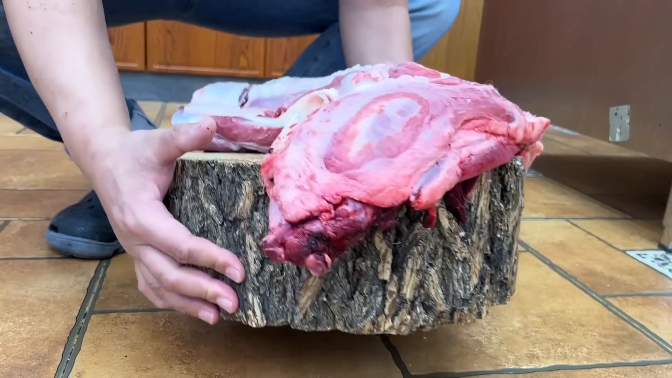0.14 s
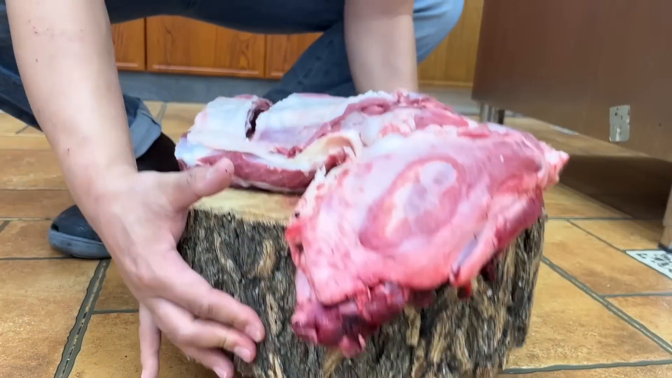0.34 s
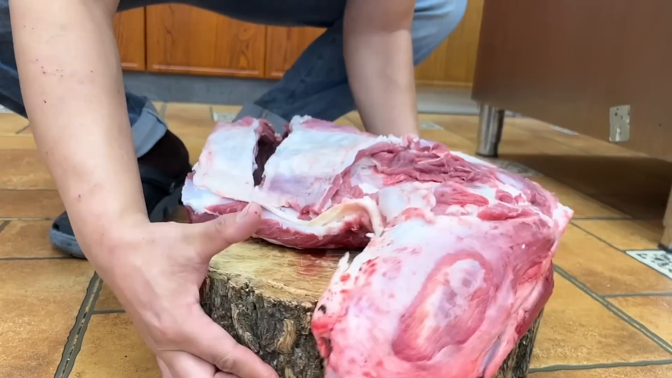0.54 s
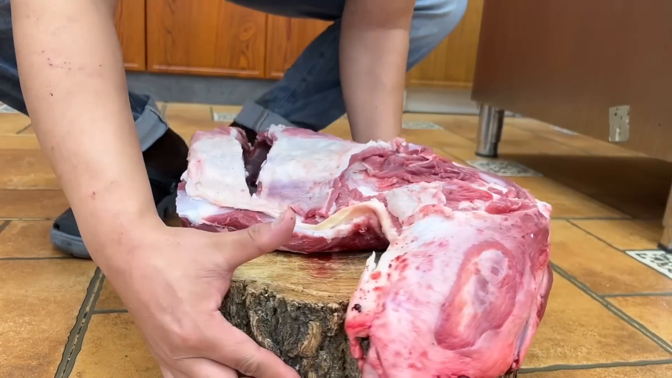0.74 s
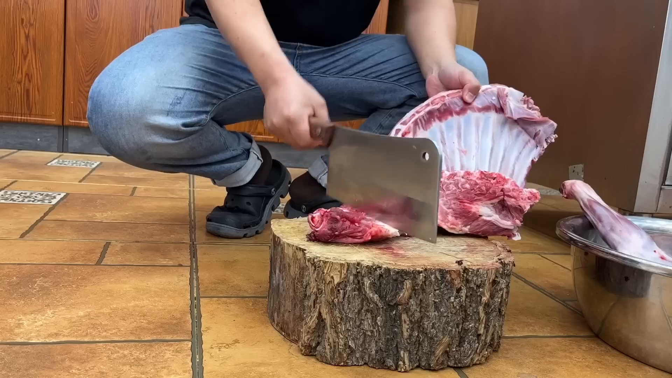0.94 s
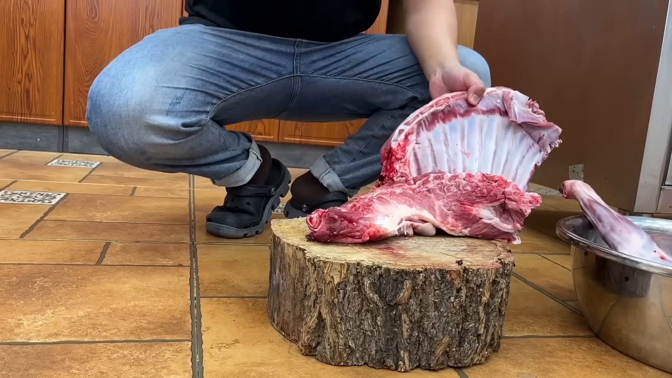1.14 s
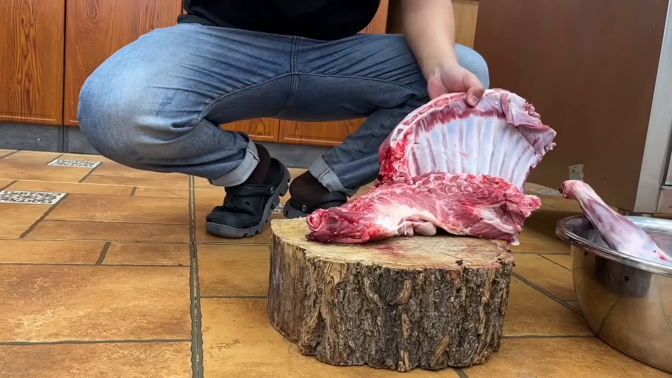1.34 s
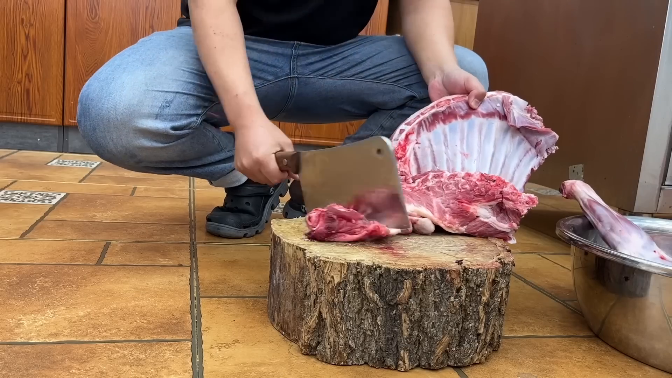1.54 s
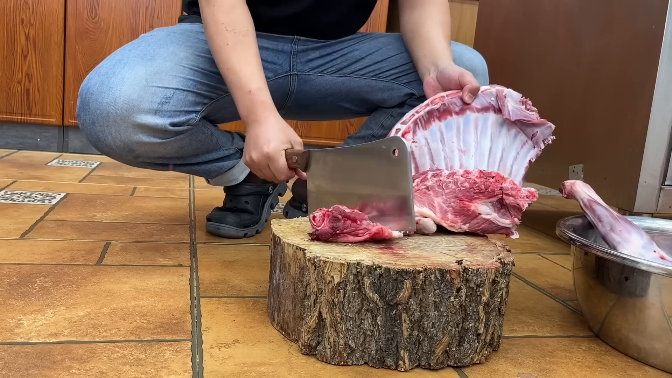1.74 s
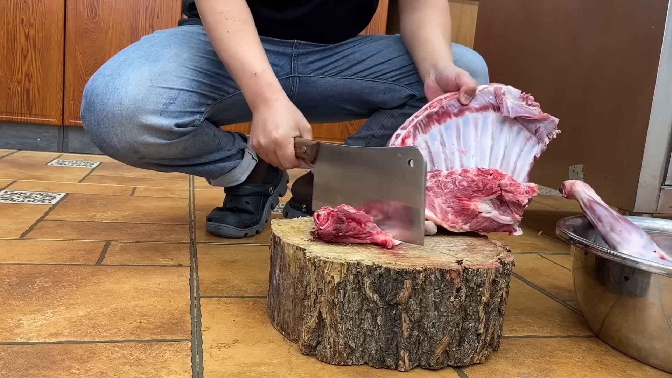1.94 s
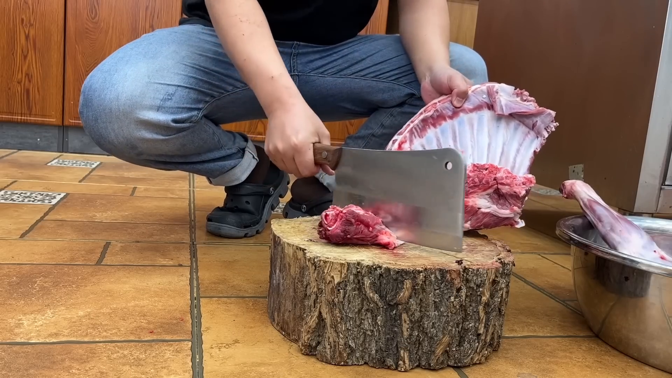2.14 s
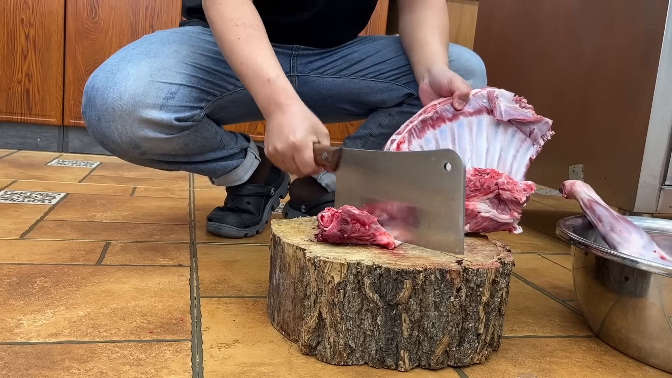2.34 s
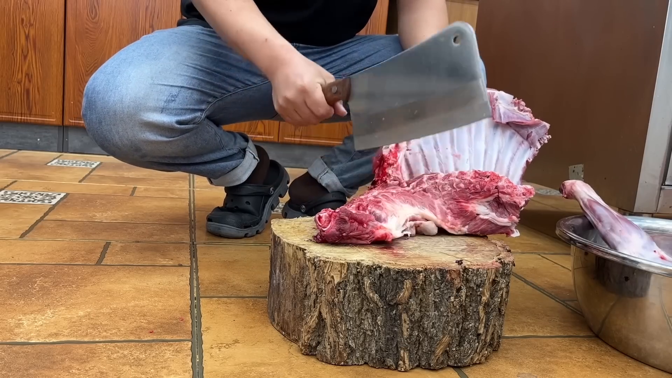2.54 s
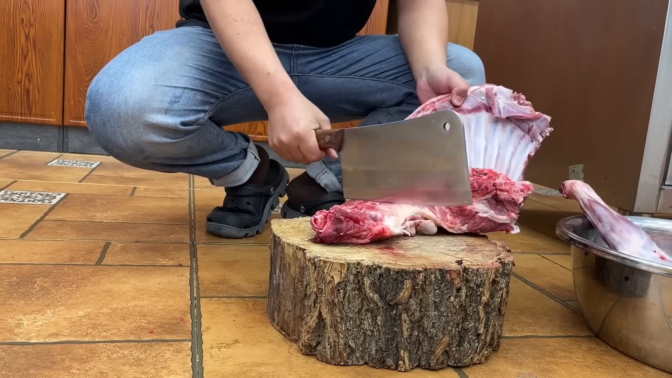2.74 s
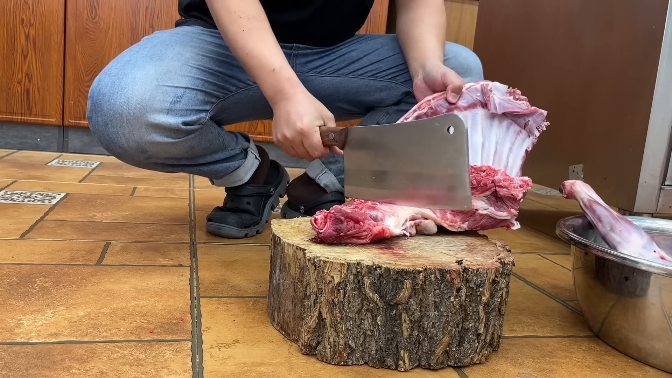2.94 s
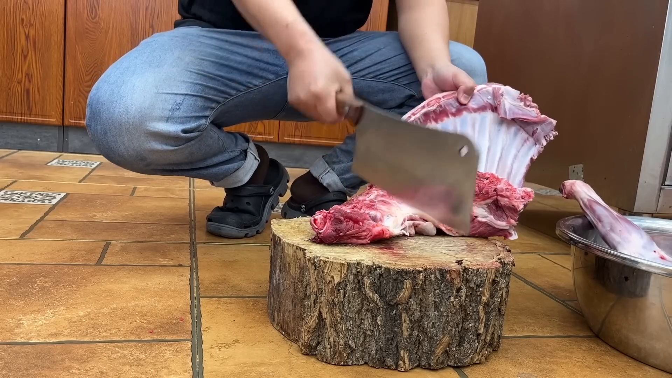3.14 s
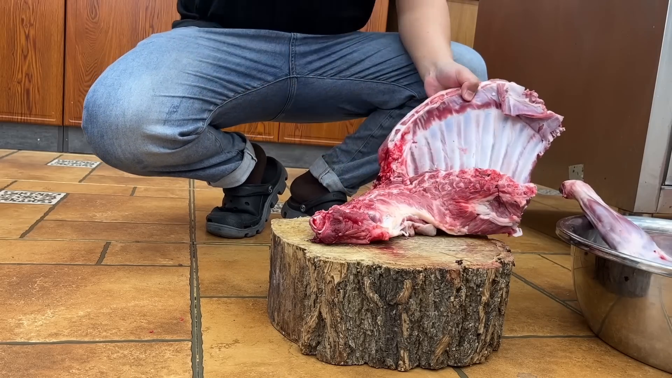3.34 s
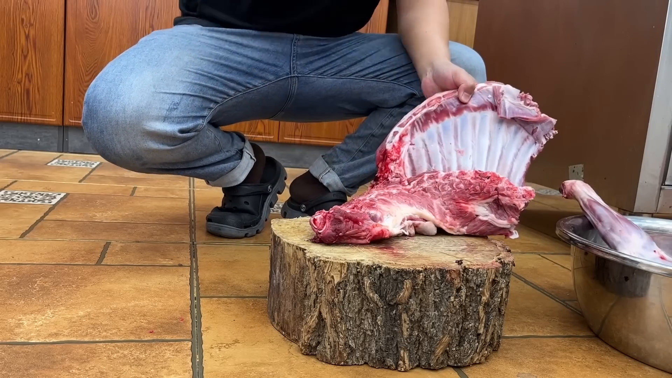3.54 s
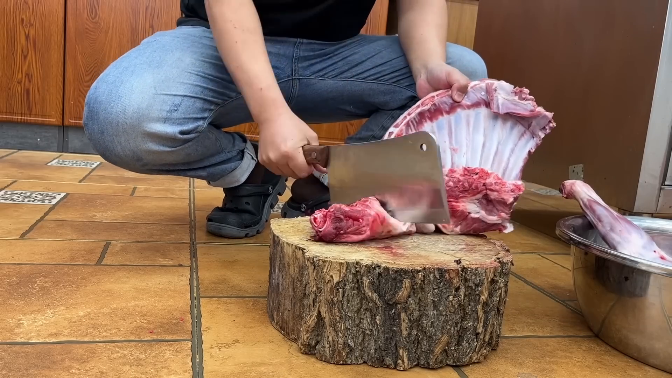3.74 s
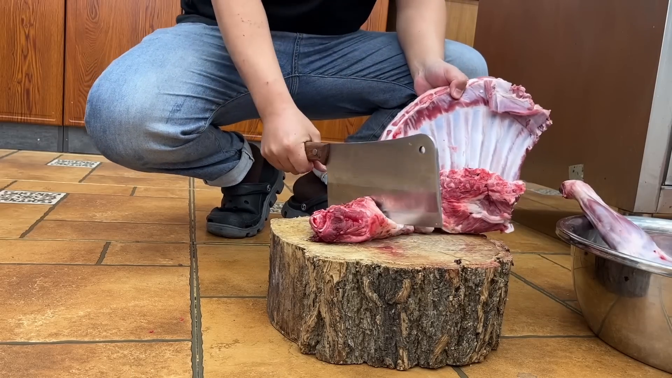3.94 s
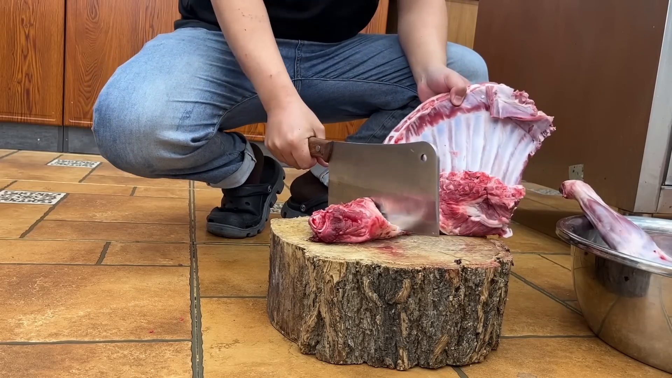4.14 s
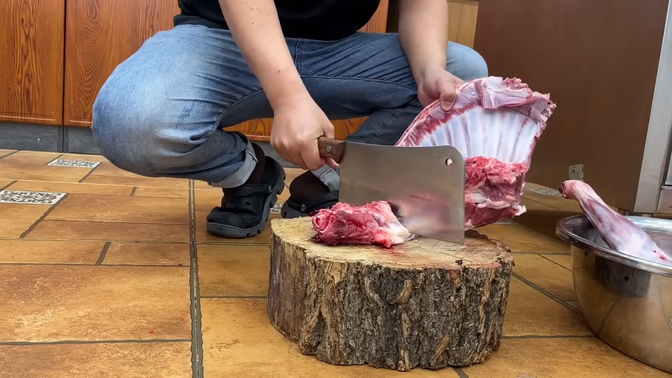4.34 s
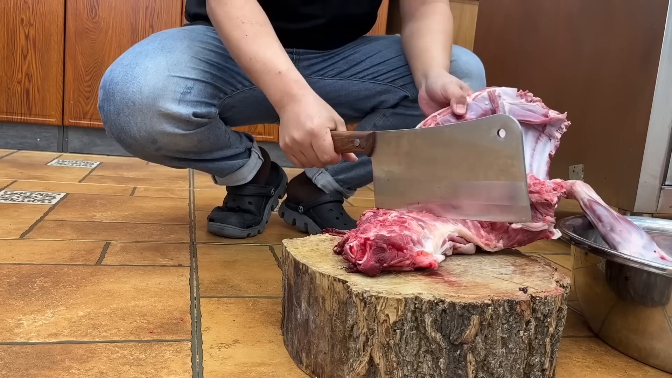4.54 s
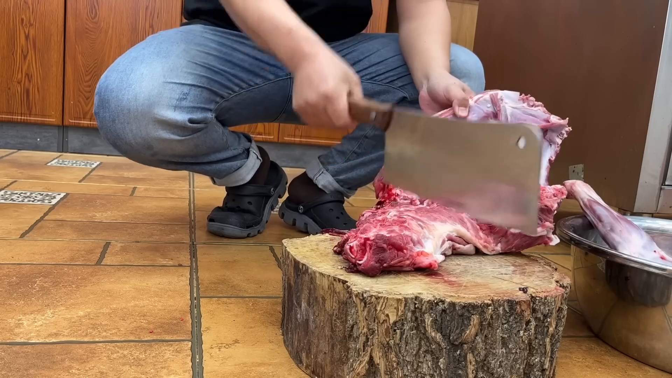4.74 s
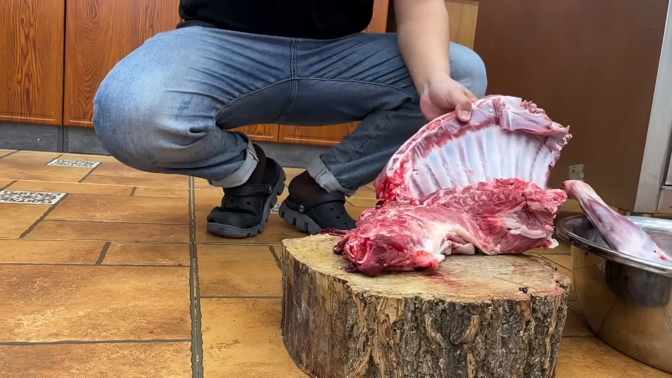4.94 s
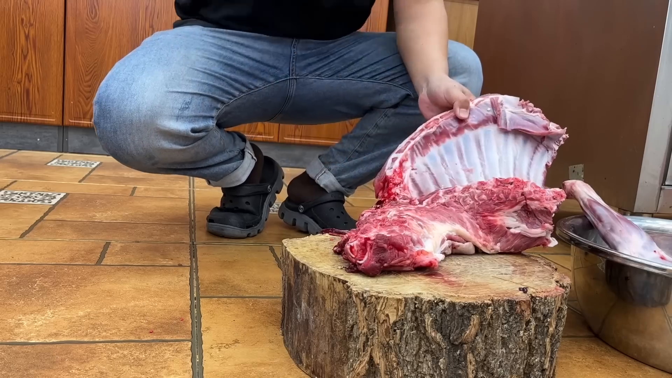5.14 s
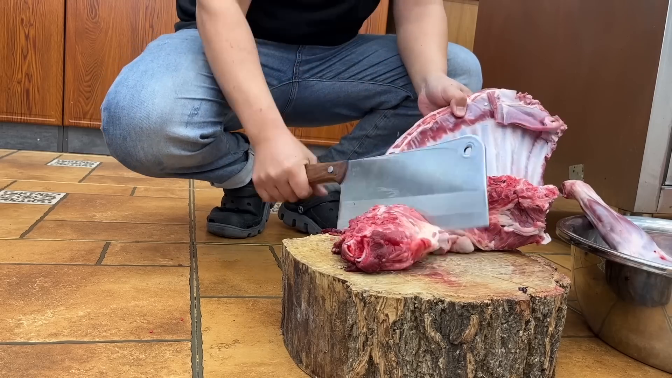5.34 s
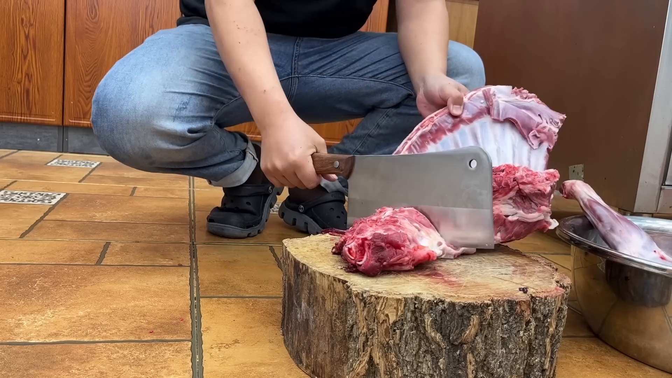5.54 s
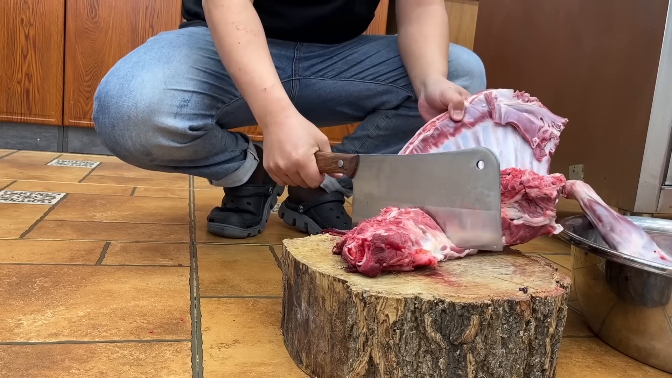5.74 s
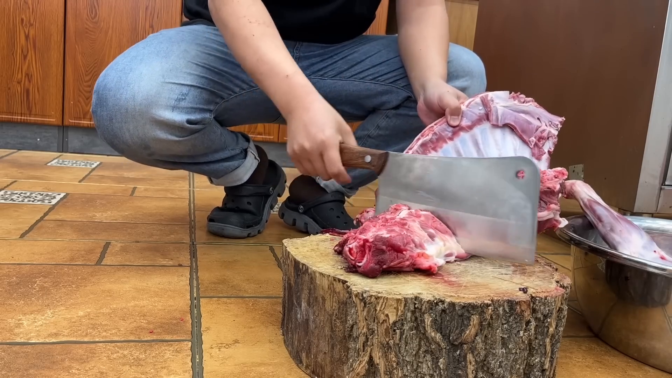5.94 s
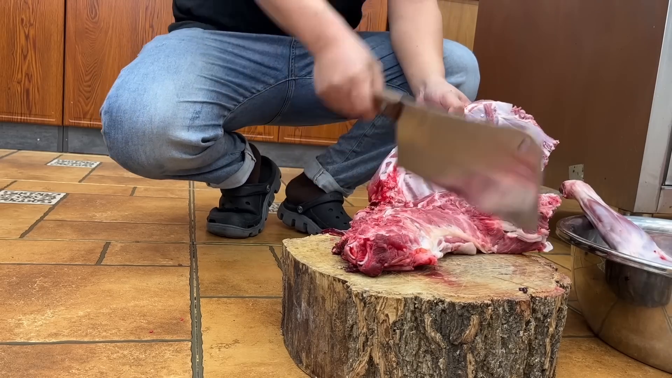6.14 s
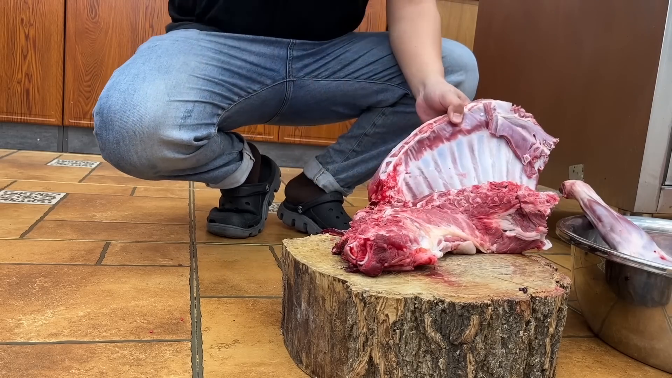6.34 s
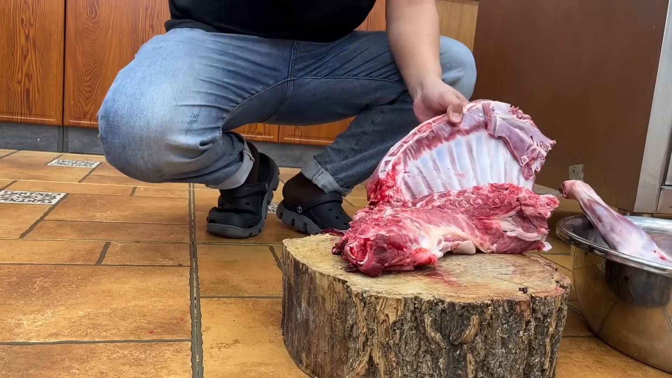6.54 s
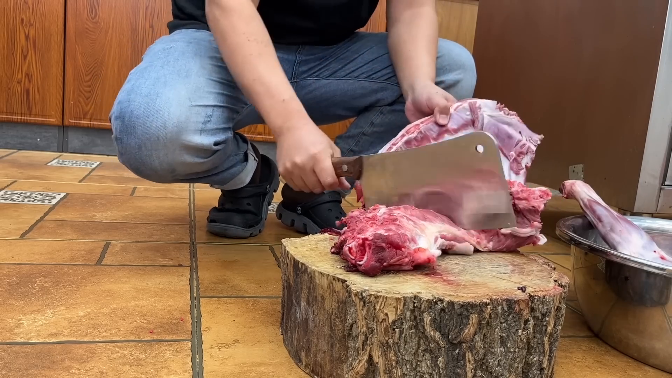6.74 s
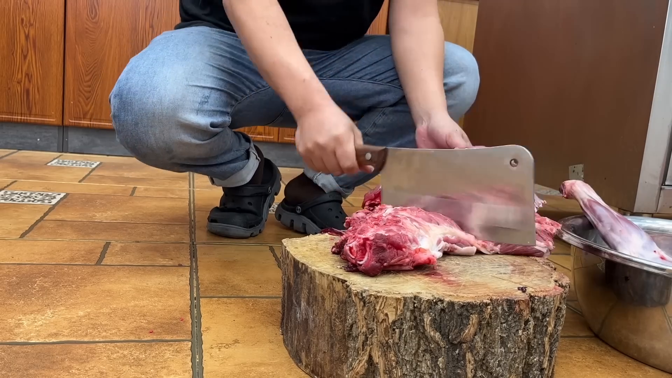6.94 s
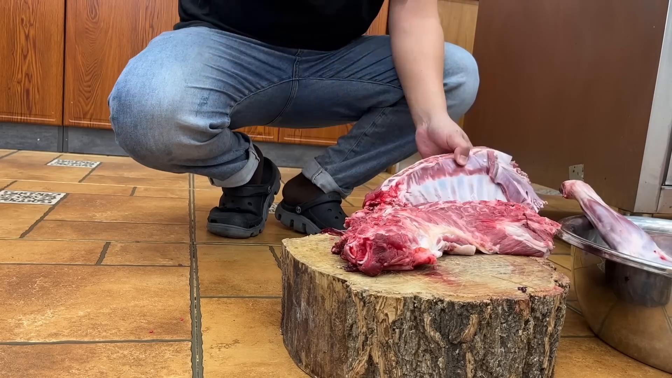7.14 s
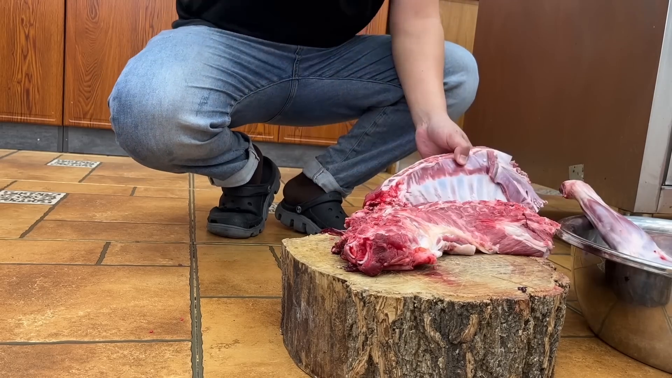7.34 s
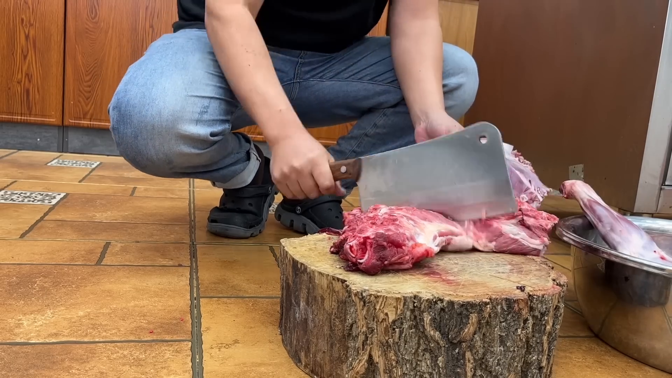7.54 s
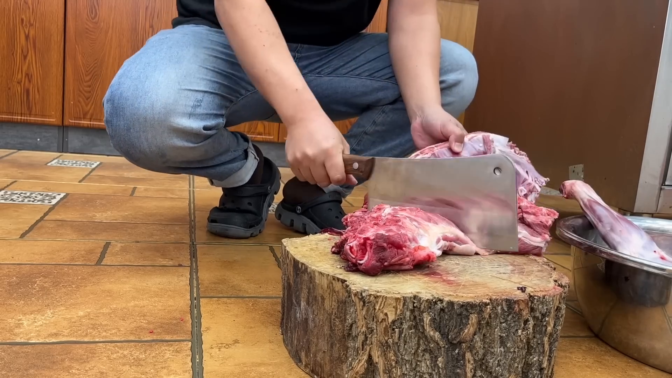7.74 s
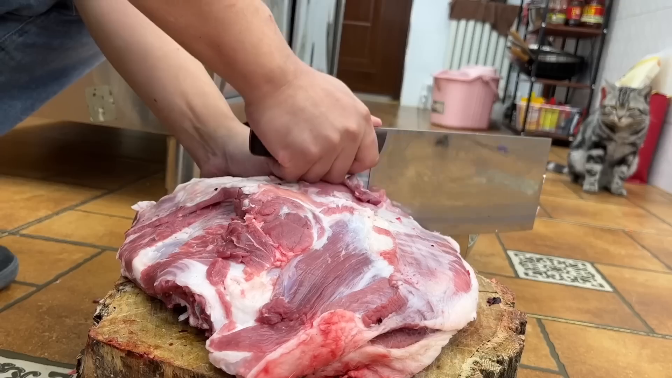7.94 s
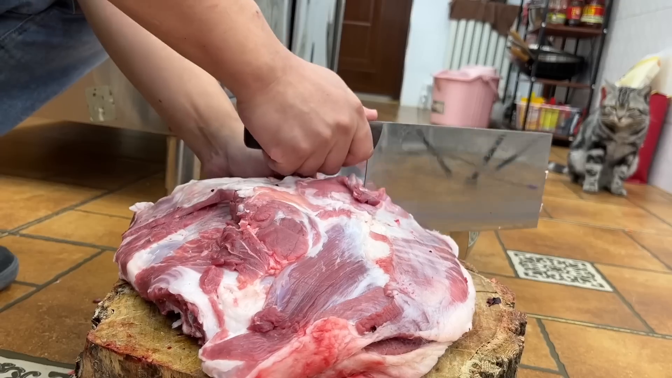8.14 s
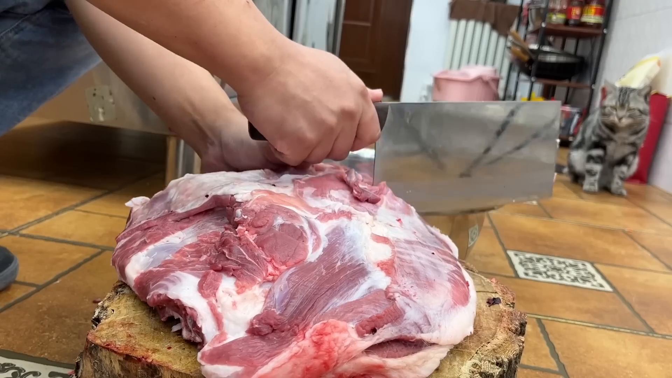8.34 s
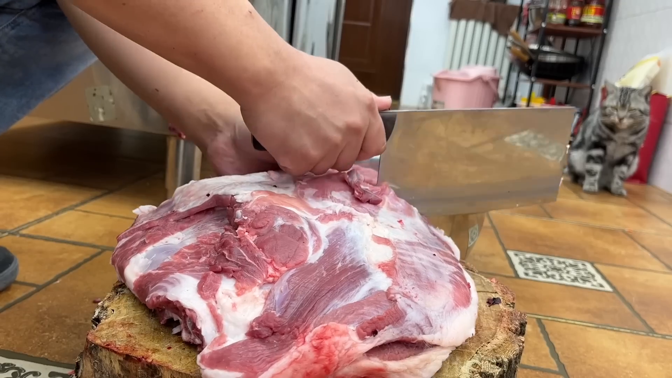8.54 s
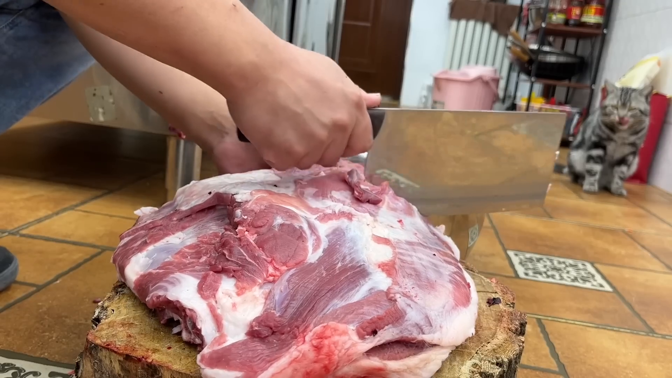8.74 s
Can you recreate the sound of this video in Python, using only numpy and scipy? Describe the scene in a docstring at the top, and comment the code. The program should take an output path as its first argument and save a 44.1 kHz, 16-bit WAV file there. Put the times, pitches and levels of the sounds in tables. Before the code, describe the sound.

Over a very faint low hum, hands and cloth rustle from the start, with small scrapes. A heavy wooden block bumps the tiled floor at about 0.47 s and again, a little softer, at 0.59; the echo stops short near 0.9. After a quiet gap and a brush, a cleaver chops hard at 1.4 s: splintery crack, hollow wooden knock, low floor thud and a brief steel ring. Thin blade whines follow, and metallic clinks at 2.1, 2.35 and 2.6 amid rustling. More chops fall at 3.6, 5.2, 6.57 and 7.43 s, varying from woody to sharp and clicky, with bright hard-room echoes, some abruptly cut near 6.1, 7.0 and 7.95. Scuffs and cloth movement fill the gaps. From 8 s only close, hissy handling, soft muffled knocks at 8.1 and 8.7, and a faint low drone remain. Stereo microphone nearby, peaks softly overloaded.

```python
"""Hands and cloth rustle over a faint hum as a wooden block bumps down on a tiled floor; then a heavy cleaver chops
meat and bone on it in a hard, echoing room. Each chop is a splintery noise crack, a filtered knock, ringing block
modes and a low floor thud; in between, the blade clinks as decaying sines, and shaped noise makes brushes, thin
whines and one low drone. A decaying noise tail makes the echoes, some of which stop short."""
import sys
import numpy as np
from scipy import signal
from scipy.fft import rfft, irfft
from scipy.io import wavfile
from scipy.ndimage import uniform_filter1d

SR = 44100
rng = np.random.default_rng(int(sys.argv[2]) if len(sys.argv) > 2 else 0)


def dump(signal):
    """Clip the signal to [-1, 1] and save it as 16-bit WAV at the path in sys.argv[1]."""
    limited = np.clip(np.atleast_2d(signal).T, -1, 1)
    pcm = np.round(limited * 32767).astype(np.int16)
    wavfile.write(sys.argv[1], SR, pcm)


N = 391166  # length in samples


def gain_of(db):
    """Decibels to amplitude factor."""
    return 10 ** (np.asarray(db) / 20)


def evened(x):
    """Scales a signal to an RMS of one."""
    return x / np.sqrt(np.mean(x ** 2) + 1e-20)


def scaled(x, db, length_s):
    """Sets the energy of a short sound to that of an RMS level held for length_s."""
    return x * gain_of(db) / np.sqrt((x ** 2).sum() / (length_s * SR))


def read(points, hz):
    """Reads a curve of (frequency, value) points along a log frequency axis."""
    f, value = np.transpose(points)
    return np.interp(np.log(hz + 1), np.log(f + 1), value)


def octaves(hz, centre_hz):
    """Signed distance from a centre pitch, in octaves."""
    return np.log2((hz + 1) / centre_hz)


def colour(db_of):
    """Minimum-phase filter whose gain in dB is a function of frequency, so nothing sounds ahead of the blow."""
    level_db = np.maximum(db_of(abs(np.fft.fftfreq(4096, 1 / SR))), -100)
    log_gain = np.log(gain_of(level_db))
    return np.fft.ifft(np.exp(np.conj(signal.hilbert(log_gain)))).real[:2048]


def ring(modes, t, best_hz, slope_db, damping=0.99, rise_s=0.0009):
    """Decaying sines started by one blow; modes lose slope_db per octave away from best_hz."""
    hz, db, t60 = np.transpose(modes)[:, :, None]
    level_db = db - slope_db * abs(np.log2(hz / best_hz)) - 60 * damping * t / t60
    sines = gain_of(level_db) * np.sin(2 * np.pi * hz * t)
    return sines.sum(0) * (1 - np.exp(-t / rise_s))


def add(mix, start_s, sound):
    """Lays a sound into the mix, trimmed at the end."""
    part = mix[:, round(start_s * SR):][:, :sound.shape[1]]
    part += sound[:, :part.shape[1]]


# hum swells: t/s, half width/s, rise of level/dB
HUM_SWELLS = [(.3, 0.18, 20.5), (7.25, 0.16, 7.5), (8.201, 0.17, 12.5)]
HUM_HZ, HUM_DB = 100, -67


def hum():
    """A low sine whose phase and level waver slowly, with brief swells."""
    t = np.arange(N) / SR
    noise = rng.standard_normal((2, N))
    phase_waver, level_waver = evened(uniform_filter1d(uniform_filter1d(noise, 2500), 2500))
    phase = 2 * np.pi * HUM_HZ * t + 0.8 * phase_waver
    swell_db = sum(db * np.exp(-((t - at) / half) ** 4) for at, half, db in HUM_SWELLS)
    return gain_of(HUM_DB + swell_db + 0.83 * level_waver) * np.sin(phase)


# hands and cloth move: t/s, rustle movement/dB (shared out by FOLLOW), hiss rise/dB
MOVEMENT = [(0, 13.5, 14), (.2, 21, 24), (.44, 19.5, 16.5), (.9, 13.5, 9.5), (1.05, -5, -1),
            (1.4, 0.5, 2.5), (2.1, 20.5, 16), (2.4, 17.5, 11), (2.6, 4.5, -10), (3.1, 9.5, 6),
            (3.3, 6.5, 3), (3.45, -3, 0), (4.15, 15.5, 8.5), (4.45, 24.5, 18), (4.55, 0, -1),
            (5.15, 6.5, 4), (5.9, 15, 15), (6.07, 11, 12), (6.5, 4, 3.5), (7.05, 16.5, 13.5),
            (7.24, 4, -9.5), (7.9, 22.5, 11), (8.15, 24, 25.5), (8.5, 19.5, 24), (8.87, 20.5, 25)]
# still-room floor of rumble, shuffle, rustle, hiss: level/dB
STILL_LEVEL = [-66, -79, -87.5, -96]
# share of the rustle movement taken by rumble, shuffle, rustle: factor
FOLLOW = [.45, 0.51, 0.9]
# noise colour, relative within each range: f/Hz, density/dB per Hz
AIR_COLOUR = [(20, -16), (50, -1.5), (75, -5.5), (150, -16), (300, -18), (480, -19.5), (710, -24),
              (2000, -23), (4900, -29), (7300, -36.5), (7950, -65), (9400, -31), (13200, -34.5),
              (16500, -71.5)]
# stereo width of room noise and scuffs: f/Hz, side level/dB
AIR_WIDTH = [(60, -19.5), (110, -15.5), (200, -6), (380, -10), (700, -4.5), (1290, 0), (2380, -6.5),
             (4400, -0.5), (8120, 0), (15000, -4.5)]


def rustle():
    """Hands and cloth: patchy noise in four ranges, each rising and falling with the movement."""
    frames, hz = N // 512 + 5, np.fft.rfftfreq(2048, 1 / SR)
    a, b, patches = rng.standard_normal((frames, 1025, 3, 2)).transpose(2, 3, 1, 0)
    patches = evened(uniform_filter1d(uniform_filter1d(patches[0], 30, 0), 5, 1))
    flicker = evened(uniform_filter1d(rng.standard_normal(frames), 3))
    spectrum = (a + 1j * b) * gain_of(read(AIR_COLOUR, hz)[:, None] + 2.0 * patches + 1.5 * flicker)
    spectrum[1] *= gain_of(read(AIR_WIDTH, hz))[:, None]

    move_s, rustle_db, hiss_db = np.transpose(MOVEMENT)
    levels = np.array(STILL_LEVEL)[:, None] + [*np.outer(FOLLOW, rustle_db), hiss_db]
    band = np.digitize(hz, [400, 2000, 8300])  # rumble | shuffle | rustle | hiss, split in Hz
    t, out = np.arange(N) / SR, np.zeros((2, N))
    for k, db in enumerate(levels):
        in_band = spectrum * (band == k)[:, None]
        part = signal.istft(in_band, nperseg=2048, noverlap=1536)[1][:, :N]
        out += part / part[0].std() * gain_of(np.interp(t, move_s, db))
    return out


# reverb decay: f/Hz, t60/s
ROOM_DECAY = [(60, 1.7), (160, 0.52), (420, 0.83), (1100, 0.78), (2910, 0.86), (7680, 0.52)]
# echo colour: f/Hz, level/dB
ROOM_COLOUR = [(40, 0), (150, 3.5), (500, 5), (1500, -2.5), (4000, 0), (7000, 3), (10000, 1), (14000, -6),
               (15000, -24)]
# first wall echoes: t/s, relative level/dB
WALLS = [(.009, -3.5), (.0175, -1), (.021, 2), (.027, -5.5), (.038, -0.5), (.052, -7)]
# narrow dip near 8 to 9 kHz in the mid of echoes and scuffs: f/Hz, level/dB
MID_DIP = [(7300, 1.5), (7900, -18), (9000, -28), (9600, -1)]
# stereo width of the echoes: f/Hz, side over mid/dB
ECHO_WIDTH = [(60, -21.5), (110, -15), (200, -9), (380, -6), (700, -2), (1290, 2.5), (2380, -2.5),
              (4400, 1), (8120, 2.5), (15000, -10)]


def room():
    """Mid and side answers of the room: a few wall echoes, then a dense tail dying band by band."""
    size = SR * 3 // 2
    t = np.arange(size) / SR
    build_up = np.clip(t / 0.0098, 0, 1) ** 0.5
    tail = rng.standard_normal((2, size)) * build_up / np.sqrt(0.025 * SR)
    for k, (echo_s, db) in enumerate(WALLS):
        # alternate walls lean to opposite sides
        tail[:, round(echo_s * SR)] += gain_of(db - 10.0) * np.array([1, .5 * (-1) ** k])
    hz, t, z = signal.stft(tail, SR, nperseg=256, noverlap=192)
    z = z * gain_of(-60 * t / read(ROOM_DECAY, hz)[:, None])
    tail = signal.istft(z, SR, nperseg=256, noverlap=192)[1][:, :size]
    mid = colour(lambda f: read(ROOM_COLOUR, f) + read(MID_DIP, f))
    side = colour(lambda f: read(ROOM_COLOUR, f) + read(ECHO_WIDTH, f))
    return signal.oaconvolve(tail, [mid, side], axes=1)[:, :size]


# stereo width of direct sound: f/Hz, side over mid/dB
DIRECT_WIDTH = [(60, -10.5), (110, -11.5), (200, -22.5), (380, -15), (700, -14.5), (1290, -12.5),
                (2380, -18), (4400, -14), (8120, 4.5), (15000, -7.5)]


def placed(near, sent, hall, stop_s):
    """Direct sound on mid and, a quarter cycle apart, on side; plus its echo, all ended at stop_s."""
    width = colour(lambda f: read(DIRECT_WIDTH, f))
    side = signal.oaconvolve(signal.hilbert(near).imag, width)[:len(near)]
    out = signal.fftconvolve(sent[None], hall, axes=1)
    out[:, :len(near)] += [near, side]
    t = np.arange(out.shape[1]) / SR
    return out * np.clip((stop_s - t) / 0.0017, 0, 1)


# brushes and scrapes, narrow blade whines, and one low drone near 67 Hz: t/s, nominal length/s, centre f/Hz,
# narrowness/dB per octave, level/dB
SCUFFS = [(0.204, 0.038, 1840, 30, -60), (0.27, 0.053, 890, 7.5, -57.5), (0.423, 0.081, 1989, 4, -54),
          (0.841, 0.084, 2440, 13, -68.5), (1.351, 0.18, 3500, 4.5, -56), (1.712, 0.58, 2700, 104, -69),
          (1.703, 0.31, 2090, 108.5, -65.5), (2.906, 0.49, 1364, 26.5, -72.5),
          (2.914, 0.32, 3780, 113, -80), (3.17, 0.11, 3500, 15.5, -74), (4.81, 0.13, 4400, 71, -72),
          (4.796, .15, 2800, 73, -77), (4.803, 0.18, 1000, 10.5, -70.5), (6.071, 0.14, 2500, 5.5, -69),
          (6.264, 0.12, 3500, 8.5, -69), (7.04, .16, 1300, 25, -74), (7.367, 0.18, 3500, 11, -64),
          (8.023, 0.12, 1284, 77, -63.5), (8.255, 0.27, 4800, 13.5, -63), (8.726, 0.15, 2540, 81.5, -65),
          (8.495, 0.55, 67.1, 37, -61.5), (8.713, 0.25, 1400, 25, -65.5)]


def scuff(row, chance):
    """Grainy noise around one colour, quick to start, slow to fade; the narrowest turn into tones."""
    _, length_s, centre_hz, narrow_db, db = row
    u = np.arange(chance.shape[1]) / SR / length_s
    stroke = np.clip(u / 0.083, 0, 1) * np.clip((1.3 - u) / 0.95, 0, 1)
    grain = gain_of(1.0 * evened(uniform_filter1d(chance[2], 200)))
    hz = np.fft.rfftfreq(len(u), 1 / SR)
    mid_side_db = np.array([read(MID_DIP, hz), read(AIR_WIDTH, hz)])
    shape_db = -narrow_db * abs(octaves(hz, centre_hz)) + mid_side_db
    noise = irfft(rfft(chance[:2]) * gain_of(shape_db), len(u))
    return gain_of(db) * noise / noise[0].std() * grain * stroke


# blade touches bone or wood: t/s, tick level/dB, tick colour f/Hz, ring level/dB, best excited f/Hz,
# fall-off around it/dB per octave, damping/factor
CLINKS = [(2.092, -51, 9700, -46.5, 3990, 25.5, 0.87), (2.355, -41.5, 2500, -33, 2295, 7.5, 2.05),
          (2.582, -64.5, 2995, -60, 2970, 7, 4.06), (2.620, -35.5, 1964, -33.5, 5150, 1.5, 3.9),
          (7.291, -72.5, 3080, -62, 3054, 6.5, 8.9)]
# blade modes: f/Hz, level/dB, t60/s (at damping 1)
BLADE = [(1290, -16, 0.13), (1495, -1.5, 0.6), (2234, 1, 0.15), (2300, -9, 0.22), (2635, -6, 0.54),
         (2740, -17, 0.78), (3500, -15, 0.061), (3970, -14, .2), (3850, -18, 0.17), (5150, -5, 0.17),
         (6100, -20.5, 0.22), (6200, -21, .2), (7540, -19.5, 0.18), (9980, -6, 0.054), (11400, 0, .06),
         (13400, -5, 0.091)]
# splinter colour, also tinting the tick: f/Hz, density/dB per Hz
BONE = [(410, -25), (700, -10.5), (1160, 3), (2560, -2.5), (3160, -5.5), (5090, -6), (6200, -12.5),
        (6540, -10), (7660, -22), (8300, -27.5), (11400, -15.5), (14500, -33), (16500, -57.5)]


def clink(row, chance, hall):
    """A tick on the steel sets the blade ringing."""
    _, tick_db, tick_hz, ring_db, best_hz, slope_db, damping = row
    t = np.arange(SR) / SR
    tint = colour(lambda f: 0.72 * read(BONE, f) - 4 * abs(octaves(f, tick_hz)))
    tick = signal.oaconvolve(chance * np.exp(-t / 0.0035), tint)[:SR]
    ringing = gain_of(ring_db) * ring(BLADE, t, best_hz, slope_db, damping, rise_s=0.001)
    near = scaled(tick, tick_db, .004) + ringing
    return placed(near, gain_of(-15.0) * near, hall, 2.5)


def splinters(chance, tint, length_s):
    """Bone gives way: spiky noise held for a few ms, with a weak lingering crackle."""
    t = np.arange(len(chance[0])) / SR
    attack = np.clip(t / 0.0004, 0, 1) ** 2
    burst = attack * (np.exp(-np.maximum(t - length_s, 0) / 0.002) + 0.12 * np.exp(-t / 0.013))
    spiky = chance[0] * gain_of(3.3 * chance[1])
    return signal.oaconvolve(spiky * burst, tint)[:len(t)]


def wood_knock(size, lag_s, knock_hz, narrow_db):
    """Knock spread by bending waves in the wood: the lows arrive late."""
    wood = colour(lambda f: -narrow_db * abs(octaves(f, knock_hz)) ** 1.4
                  - 35 * np.maximum(octaves(f, 1550), 0))
    hz = np.fft.rfftfreq(size, 1 / SR) + 1
    slower = np.exp(-2j * np.pi * (lag_s * hz + 2.5 * np.log(1 + hz / 300)))
    return irfft(rfft(wood, size) * slower, size)


# block modes: f/Hz, level/dB, t60/s (at damping 1)
BLOCK = [(184.7, 0.5, 0.073), (223, 3, .06), (294, 6.5, 0.04), (382.5, -3, 0.068), (468, 5.5, 0.024),
         (590, 4, 0.012)]
# moments when a sounding blow and its echo stop short: t/s
ECHO_STOPS = [.875, 6.075, 6.98, 7.95]
GRIP = 18  # damping factor: steel held by the meat dies this many times faster


def blow(s, crack_db, crack_hz, tilt_db, length_s, crack_echo_db, steel, lag_s, slope_db, thud_db,
         knock_db, knock_hz, narrow_db, block_db, block_hz, echo_db, chance):
    """A crack or click with any blade ring; after a lag the wood knocks, the block rings and the floor thuds."""
    stop_s = min([stop - s for stop in ECHO_STOPS if stop > s] + [N / SR])
    t = np.arange(len(chance[0])) / SR
    after = np.maximum(t - lag_s, 0)
    # the sizzle tilt climbs from 6 to 12 kHz
    tint = colour(lambda f: read(BONE, f) + tilt_db * np.log2(np.clip(f / 6000, 1, 2))
                  + 6 * np.exp(-(octaves(f, crack_hz) / .5) ** 2))
    crack = scaled(splinters(chance, tint, length_s), crack_db, length_s)
    knock = scaled(wood_knock(len(t), lag_s, knock_hz, narrow_db), knock_db, 0.0075)
    block = gain_of(block_db) * ring(BLOCK, after, block_hz, slope_db)
    floor = [(48.7, -8.5, .2), (67.3, -4.0, 0.18), (111.4, -2.5, 0.15), (155, 0.5, 0.082)]  # f/Hz, dB, t60/s
    thud = gain_of(thud_db) * ring(floor, after, 100, 0, rise_s=0.007)
    # only the modes near 3830 Hz survive
    blade = steel * ring(BLADE, t, 3830, 70, damping=GRIP)
    sent = gain_of(echo_db) * (knock + block + gain_of(-4.0) * thud) + blade
    # the echo is fed a smooth pulse in the crack's colour
    sent[:len(tint)] += scaled(tint, crack_db + crack_echo_db, length_s)
    return placed(crack + knock + block + thud + blade, sent, room(), stop_s)


# block bumps the floor or is nudged: t/s, click level/dB, floor thud/dB, knock level/dB, knock f/Hz,
# knock narrowness/dB at one octave, block level/dB, block best f/Hz, echo of the wood/dB
BUMPS = [(0.4682, -35, -24, -11, 602, 10, -19, 431, -10),
         (0.592, -46, -31.5, -10.5, 645, 6, -18.5, 600, -10.5),
         (2.354, -81.5, -69.5, -57, 541, 16.5, -57.5, 452.7, -10.5),
         (2.62, -76, -49, -45, 805, 8.5, -48.5, 302.4, -8.5),
         (8.091, -79, -65, -38, 415, 29, -36.5, 305, -16.5), (8.7, -65, -59.5, -57.5, 675, 28, -56, 298, 0),
         (8.746, -79, -72, -52, 1050, 11, -70, 300, -6)]
CLICK_HZ, CLICK_TILT_DB, CLICK_S, CLICK_ECHO_DB = 2500, -5, .005, -11  # tilt per octave, 6 to 12 kHz
BUMP_LAG_S, BUMP_SLOPE_DB = 0.0011, 2.5  # slope per octave


def bump(row, chance):
    """Wood alone: a faint click, no steel."""
    s, click_db, *wood = row
    return blow(s, click_db, CLICK_HZ, CLICK_TILT_DB, CLICK_S, CLICK_ECHO_DB, 0,
                BUMP_LAG_S, BUMP_SLOPE_DB, *wood, chance)


# chops: t/s, crack level/dB, crack colour f/Hz, sizzle/dB per octave from 6 to 12 kHz, crack length/s,
# echo of crack/dB, blade ring/dB, thump lag/s, block narrowness/dB per octave, floor thud/dB, knock level/dB,
# knock f/Hz, knock narrowness/dB at one octave, block level/dB, block best f/Hz, echo of the wood/dB
CHOPS = [(1.391, -12.5, 4300, 11, 0.0063, -11, -5, 0.0065, 28, -18.5, -22.5, 709, 14.5, -11.5, 287, -7),
         (3.585, -11.5, 5540, 5, 0.0047, -9, -25.5, 0.0051, 22, -29, -21.5, 700, 12, -12.5, 260, -4.5),
         (5.194, -16.5, 1964, 7.5, 0.0054, -4.5, -30.5, 0.00048, 12, -32.5, -17.5, 1314, 42.5, -16, 470, -2.5),
         (6.5704, -8, 2630, 4.5, 0.0011, -6, -27.5, 0.0012, 11.5, -25.5, -22, 1515, 42.5, -10.5, 400, -5),
         (7.4265, -12.5, 2150, -3, 0.006, -9, -1.5, 0.0042, 4, -22, -17, 780, 13.5, -16, 350, -0.5)]


def chop(row, chance):
    """The cleaver goes through bone into the block."""
    s, crack_db, crack_hz, tilt_db, length_s, crack_echo_db, blade_db, *wood = row
    return blow(s, crack_db, crack_hz, tilt_db, length_s, crack_echo_db, gain_of(blade_db), *wood, chance)


def scene():
    """All layers in mid and side, turned to left and right."""
    hall, mix = room(), rustle()
    mix[0] += hum()
    for row, chance in zip(SCUFFS, rng.standard_normal((len(SCUFFS), 3, SR // 2))):
        add(mix, row[0], scuff(row, chance))
    for row, chance in zip(CLINKS, rng.standard_normal((len(CLINKS), SR))):
        add(mix, row[0], clink(row, chance, hall))
    for source, table in ((bump, BUMPS), (chop, CHOPS)):
        for row, chance in zip(table, rng.standard_normal((len(table), 2, SR // 2))):
            add(mix, row[0], source(row, chance))
    mid, side = mix
    return np.array([mid + side, mid - side])


EDGE_HZ = 16300  # upper band limit


def record(dry):
    """The microphone rolls off the lowest bass and overloads softly on the peaks; then the band limit."""
    firm = signal.sosfilt(signal.butter(3, 40, "high", fs=SR, output="sos"), dry)
    held = 1.166 * np.tanh(firm / 1.073)
    lowpass = signal.firwin(511, EDGE_HZ, window=("kaiser", 9), fs=SR)
    return signal.oaconvolve(held, lowpass[None], "same")


dry = scene()
out = record(dry)
dump(out)
```